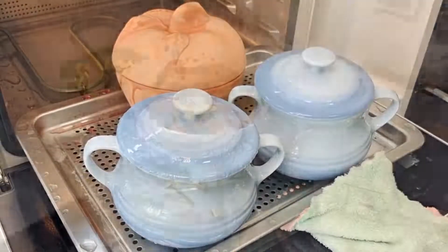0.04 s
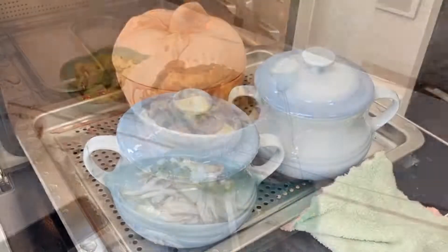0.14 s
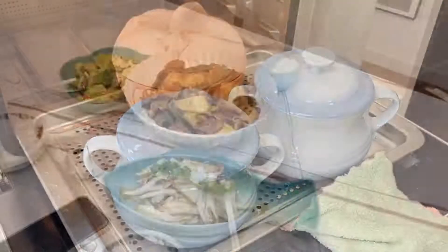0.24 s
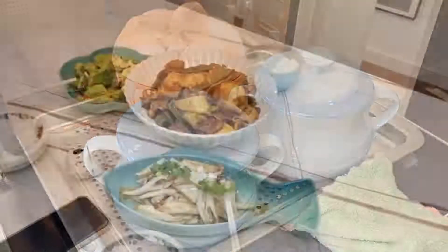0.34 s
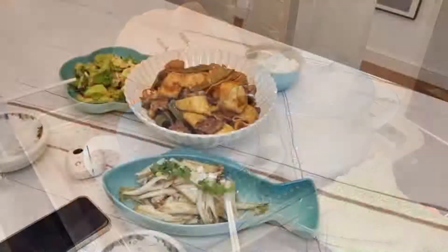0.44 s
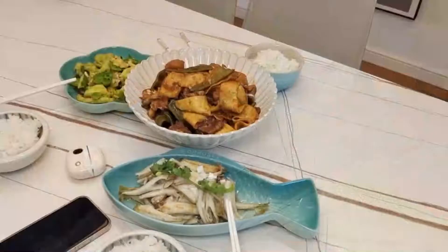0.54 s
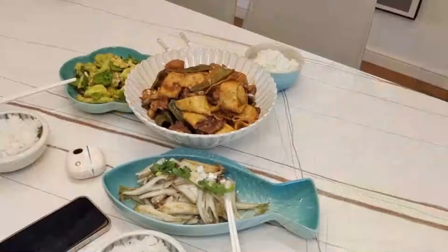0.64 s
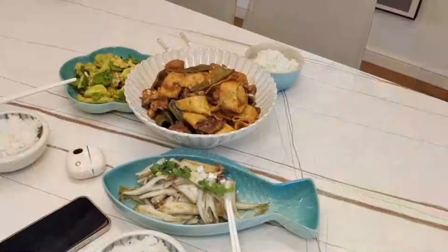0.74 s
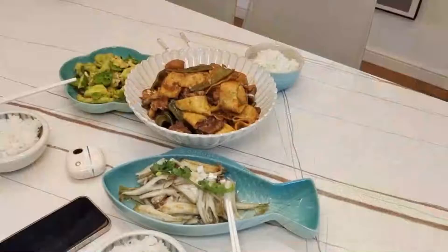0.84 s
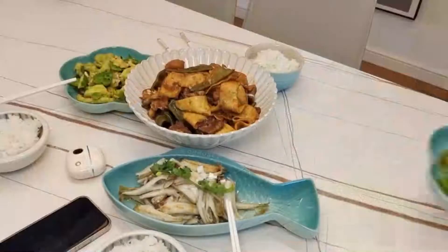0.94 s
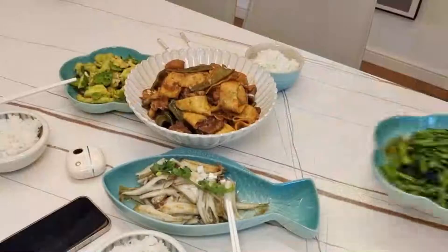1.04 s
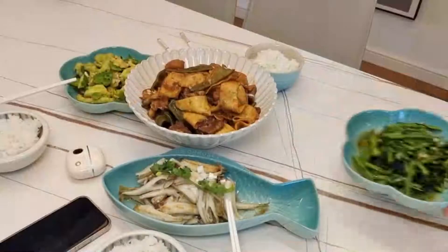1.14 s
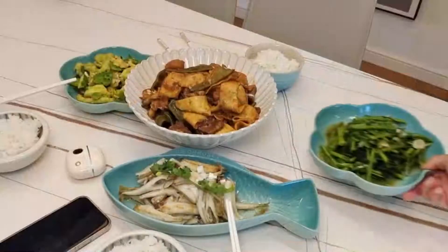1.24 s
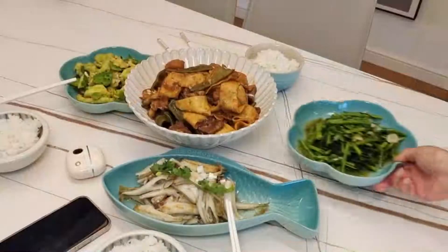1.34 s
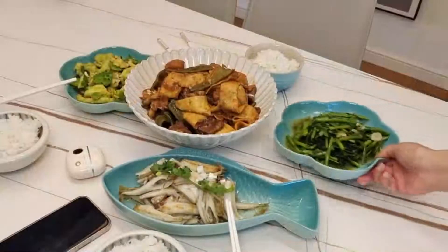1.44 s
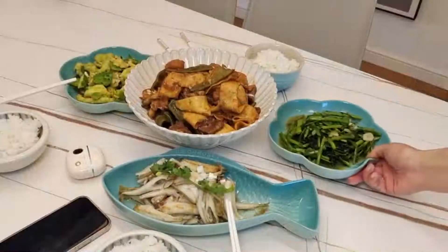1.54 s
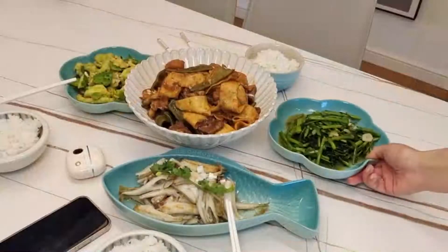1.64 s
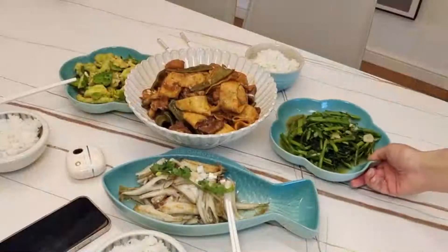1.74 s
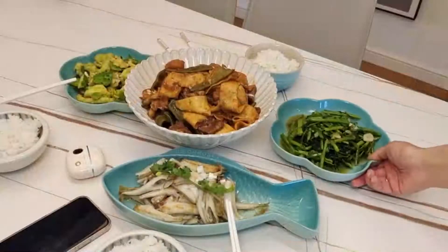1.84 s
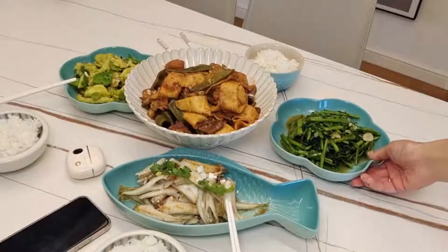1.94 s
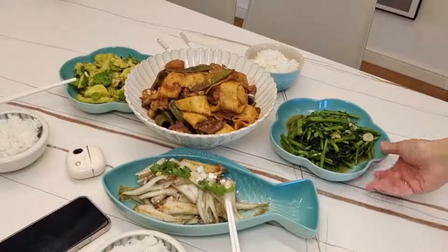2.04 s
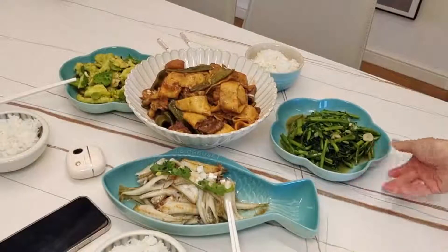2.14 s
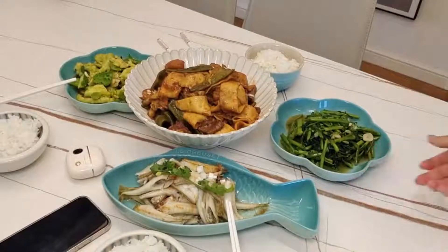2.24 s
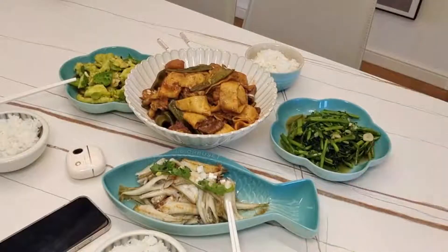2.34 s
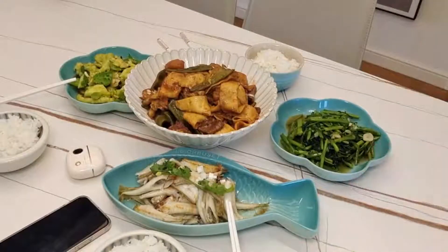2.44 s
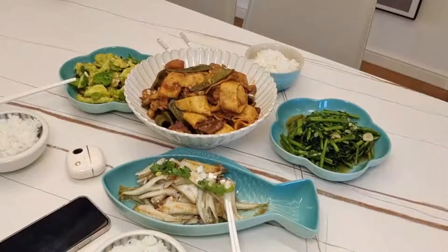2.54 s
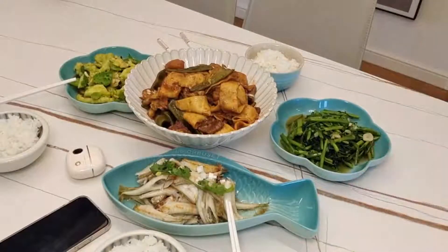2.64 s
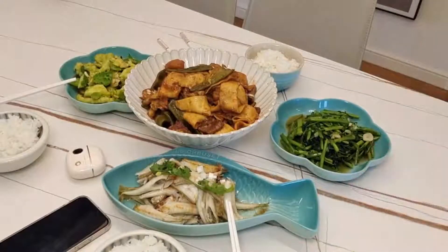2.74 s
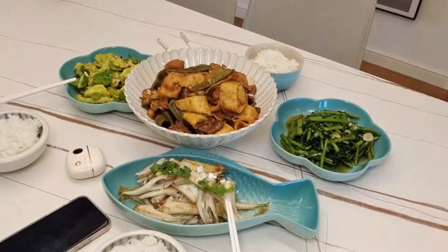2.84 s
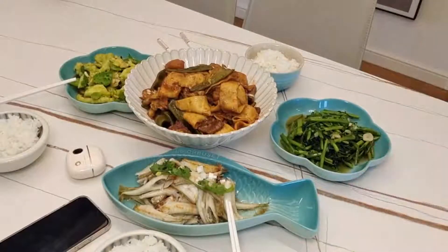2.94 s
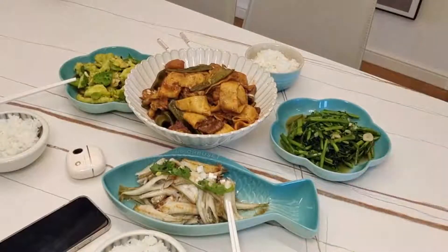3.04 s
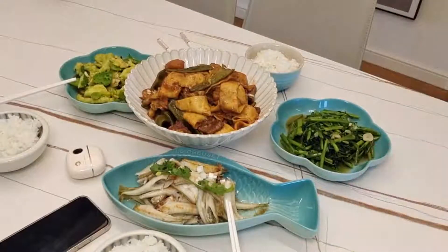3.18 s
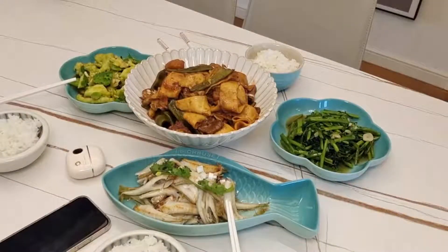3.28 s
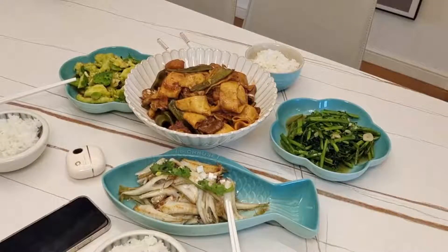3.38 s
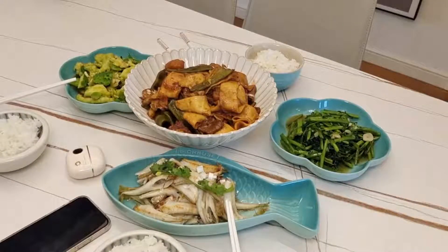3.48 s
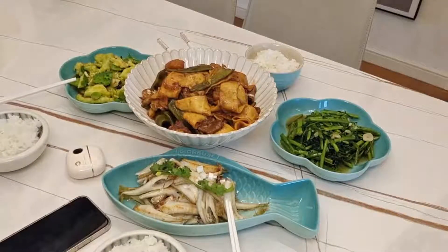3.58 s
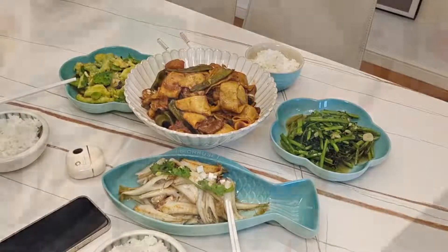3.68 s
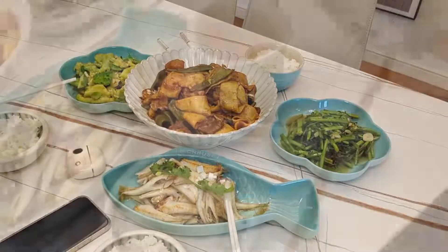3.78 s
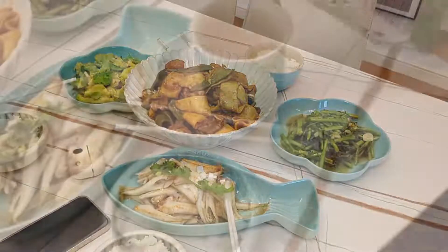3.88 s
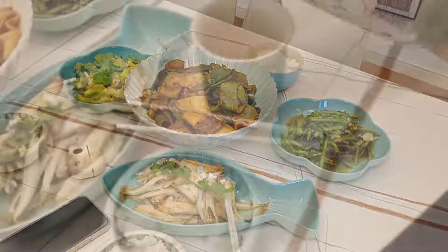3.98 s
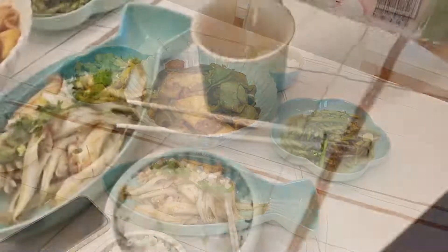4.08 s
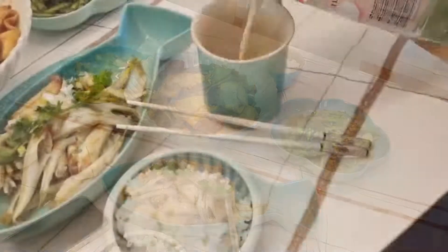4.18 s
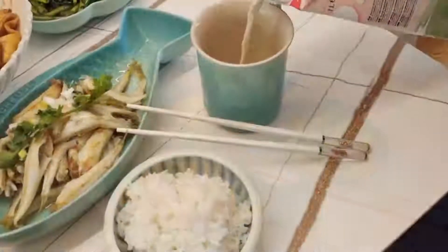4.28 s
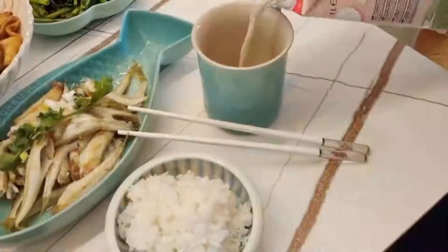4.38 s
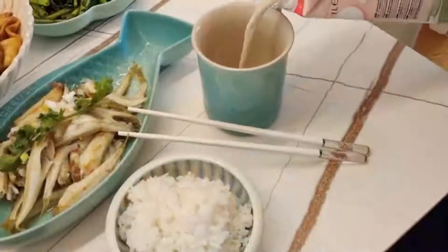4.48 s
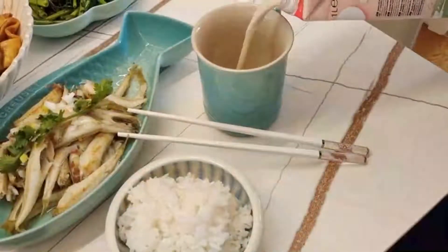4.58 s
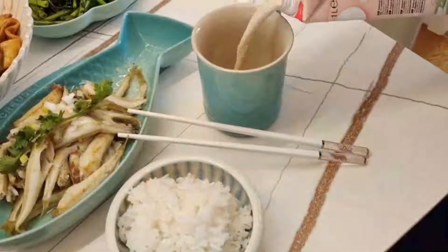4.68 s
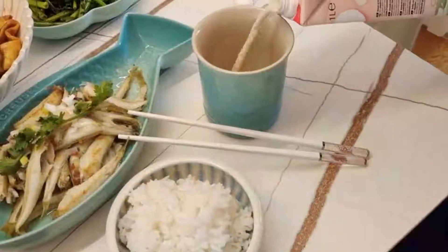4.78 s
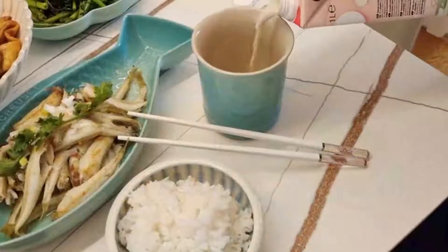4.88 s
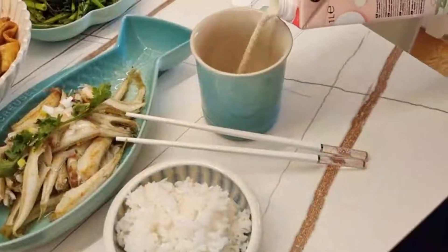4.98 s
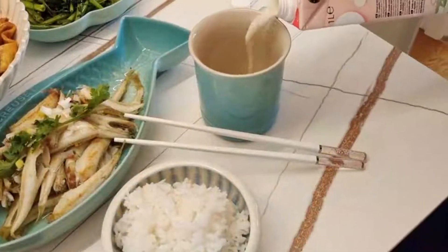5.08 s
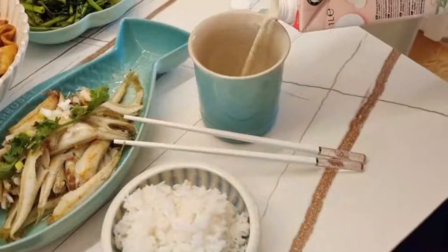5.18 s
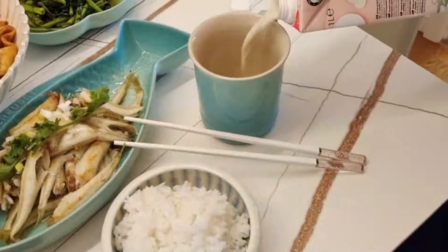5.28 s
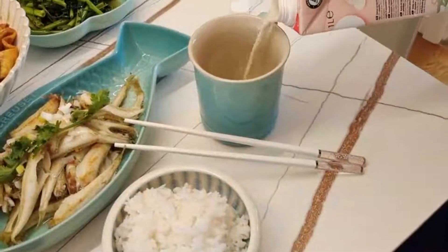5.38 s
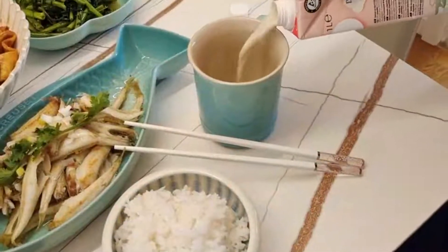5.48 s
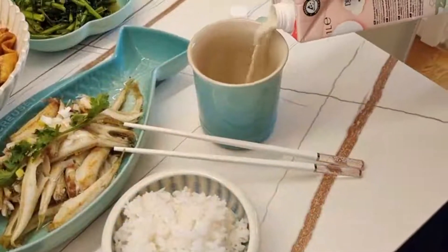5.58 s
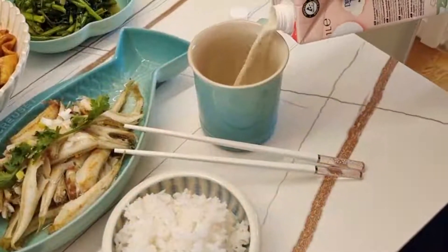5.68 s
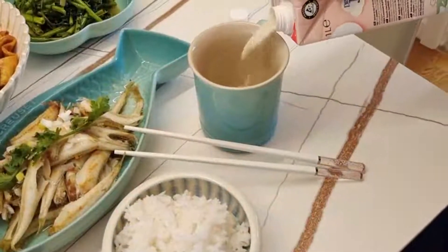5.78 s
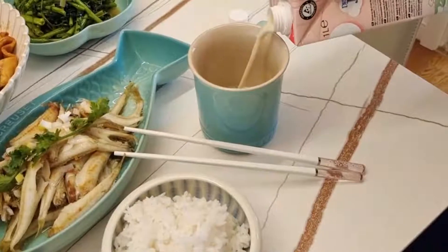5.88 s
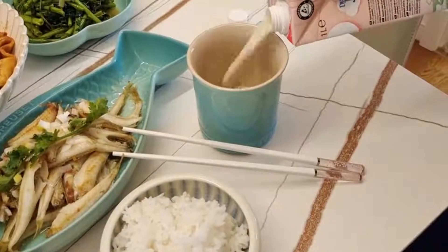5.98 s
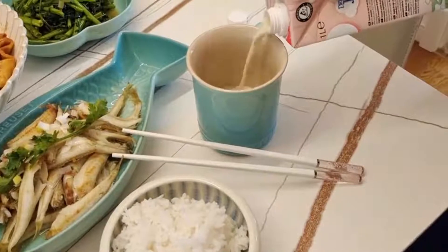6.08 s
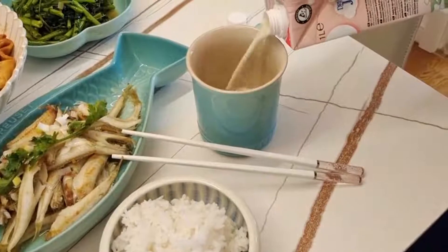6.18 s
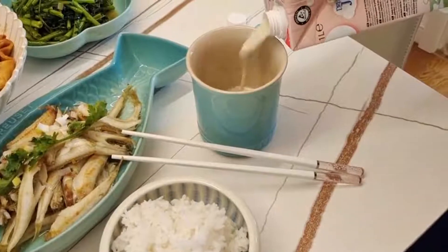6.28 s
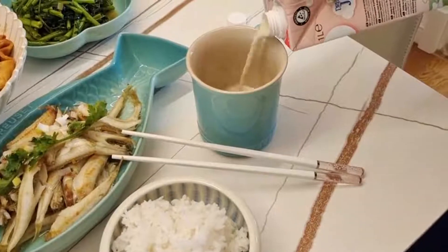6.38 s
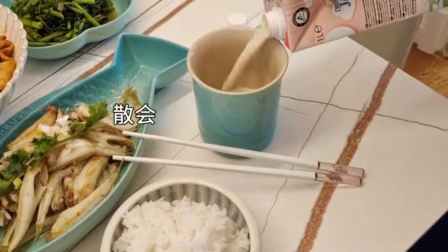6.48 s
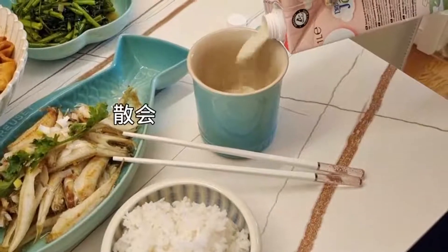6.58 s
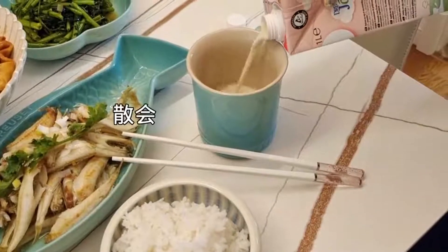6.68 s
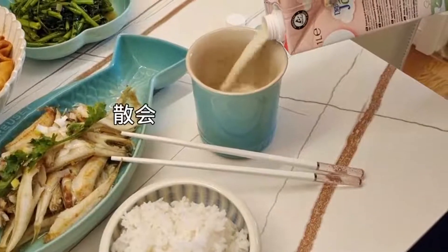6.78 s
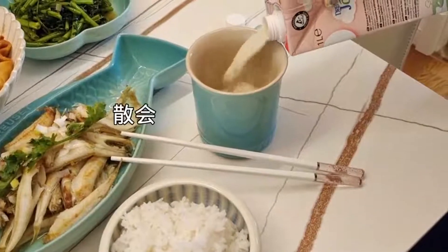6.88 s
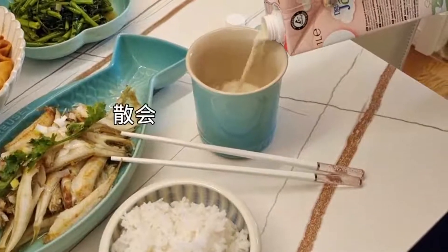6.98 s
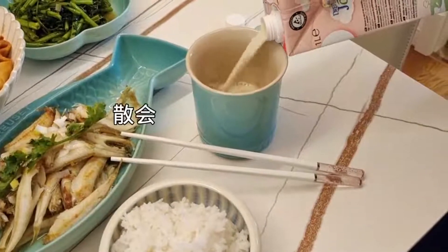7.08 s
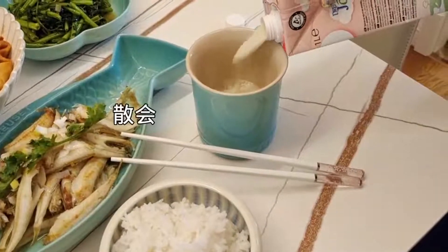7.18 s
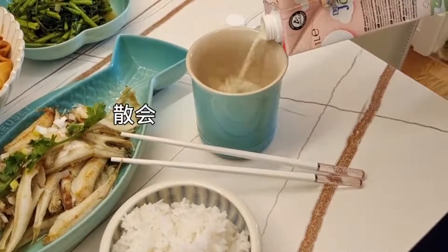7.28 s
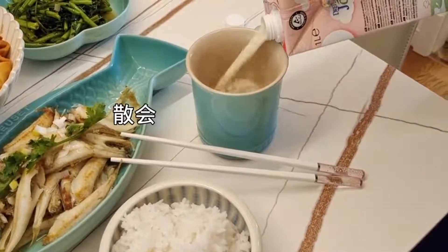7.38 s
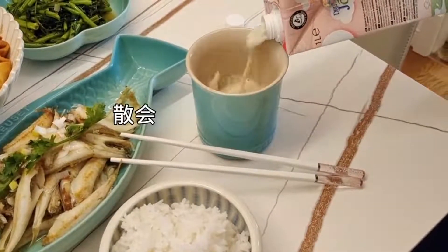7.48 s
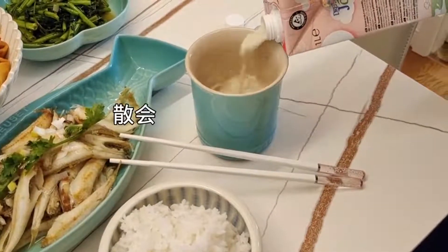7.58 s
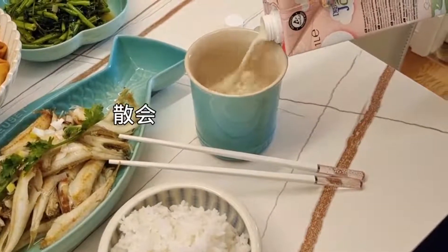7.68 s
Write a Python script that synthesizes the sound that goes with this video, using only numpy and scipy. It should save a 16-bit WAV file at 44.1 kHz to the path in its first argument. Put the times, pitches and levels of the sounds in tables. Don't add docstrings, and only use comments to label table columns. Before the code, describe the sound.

A cloth scuffs, a glazed dish knocks down sharply and rattles to rest; after near-silence, a drink pours in irregular blips and plops into a cup.

```python
import sys
import numpy as np
from scipy import signal
from scipy.io import wavfile
from scipy.ndimage import uniform_filter1d

SR = 44100
rng = np.random.default_rng(int(sys.argv[2]) if len(sys.argv) > 2 else 0)


def log_audio(samples):
    frames = np.atleast_2d(samples).T
    limited = np.clip(frames, -1, 1)
    pcm = np.round(limited * 32767).astype(np.int16)
    wavfile.write(sys.argv[1], SR, pcm)


def how_loud(loudness_db):
    steps = np.asarray(loudness_db, float) / 20
    return 10 ** steps


N = 340645

# t/s, first place level/dB, second place level/dB
PLACES = [
    (0, -60.5, -89),
    (3.487, -59.5, -79.5),
    (3.529, -57.5, -56.5),
    (4.1, -66.5, -55.5),
    (4.3, -66.5, -62),
    (4.9, -67.5, -61.5),
    (5.1, -81.5, -60.5),
    (7.8, -80.5, -57.5),
]
# f/Hz, likeness/0-1
BACKGROUND_LIKENESS = [(60, 0.86), (180, 0.81), (550, 0.19), (1650, 0.26), (4970, 0.23), (15000, 0.29)]
# f/Hz, level/dB
FIRST_TONE = [(25, -16), (65, -15), (102, -32.5), (195, -7.5), (330, -16), (516, -29), (800, -30),
              (1500, -42), (2150, -36.5), (4000, -50), (8000, -55.5), (16000, -52)]
SECOND_TONE = [(25, -16.5), (49, -2.5), (141, -20), (195, -4), (309, -14), (480, -25.5), (734, -22),
               (1300, -36), (2300, -37.5), (4000, -44), (8000, -49.5), (16000, -49)]
HUM_HZ, HUM_DB = 56.6, -60.5
WHINE_HZ, WHINE_DB = 5550, -93

# f/Hz, level/dB, time to fall 60 dB/s
LID_MODES = [(1933, 2, .26), (3545, 3, .26), (3690, -10, .2), (4640, -6, .3), (7270, -13, .2),
             (9150, -7, .25)]
LID_DB = -58

# t/s, peak level/dB, rise/s, time to fall 60 dB/s, hiss level/dB
SCUFFS = [
    (0.15, -57, 0.0074, 0.051, -10),
    (0.343, -59.5, 0.0019, 0.066, -30.5),
    (0.662, -38.5, 0.067, 0.13, -10.5),
    (3.509, -78, 0.0075, 0.54, 7),
    (3.54, -62, 0.02, 0.25, -21),
]
SCUFF_HZ = 2400

# t/s, blow level/dB, crunch time to fall 60 dB/s
KNOCKS = [(1.573, -27, 0.13), (1.578, -5.5, 0.072), (1.591, -13, 0.2), (1.597, -19, .05),
          (1.608, -21.5, 0.035), (1.614, -20, .05), (1.625, -24, 0.018), (1.644, -26, 0.27),
          (1.763, -28.5, 0.17), (1.778, -30.5, 0.042), (1.786, -21.5, 0.04), (1.795, -14, 0.03),
          (1.803, -13, 0.085), (1.812, -24.5, 0.035), (1.818, -31.5, 0.03), (1.827, -15, 0.036),
          (1.836, -23, 0.025), (1.843, -19, .04), (1.848, -22.5, 0.026), (1.858, -31.5, 0.035),
          (1.867, -41.5, 0.038), (1.876, -32.5, 0.038)]
# f/Hz, level/dB
HARD_COLOUR = [(35, -61.5), (103, -36.5), (346, -13), (1310, -2), (2000, 1.5), (5860, -22.5), (9570, -42),
               (15000, -51)]
DULL_COLOUR = [(50, -60.5), (448, -3.5), (607, -11.5), (749, -5.5), (1110, -5), (2250, -17), (8510, -62),
               (16000, -66.5)]
ROCKS_FROM_S = 1.77
LANDING_DULL, ROCKING_DULL = 0.18, 0.95
# f/Hz, level/dB, time to fall 60 dB/s
TABLE_MODES = [(135, -5, 0.25), (253, -21.5, 0.64), (360.4, -16.5, 0.21), (783, 1, 0.029), (820, 6, 0.011),
               (1252, -29.5, .6), (1505, -28, .6), (1060, 0, 0.013), (2535, -29, .25), (470, -42, .5),
               (1820, -27, 0.95), (2270, -30, 0.36)]
# f/Hz, level/dB, time to fall 60 dB/s
DISH_MODES = [(6200, -10, .1), (6100, -13, .09), (7300, -11.5, 0.12), (7750, -10.5, .15),
              (7970, -8.5, 0.07), (8800, -10, .14), (8900, -11, 0.11), (10500, -11.5, 0.11),
              (11000, -12, .12), (12300, -16, .1), (13230, -18.5, .08), (13860, -18.5, .1)]
DISH_DB = -45
# f/Hz, level/dB, time to fall 60 dB/s
TABLE_LONG_MODES = [(731, -35.5, 1.034), (578, -48, 1.4), (1000, -51, .8), (1960, -53.5, .9)]
TABLE_LONG_S = 1.828
# f/Hz, width/Hz, level/dB
SKID_BANDS = [(1300, 400, 0), (2900, 400, -9)]
SKID_END_S, SKID_DB, SKID_DB_PER_S = 1.577, -27, 1000

# t/s, peak level/dB, f/Hz
TICKS = [(3.541, -76, 2770), (3.556, -63, 2940), (3.576, -71, 2820), (3.602, -80.5, 2770),
         (3.624, -68, 2880), (3.735, -59.5, 3100), (3.733, -70, 1143), (3.749, -79, 1160),
         (4.183, -65.5, 7030), (4.313, -68.5, 2200), (4.319, -77.5, 2670), (4.699, -78, 2672),
         (4.754, -74, 2750)]
TICK_CYCLES = 9.8
# t/s, peak level/dB, f/Hz
SNAPS = [(3.621, -52, 5270), (3.735, -49, 4280), (3.735, -44, 5750), (3.747, -48, 5970), (4.904, -62, 5250),
         (4.916, -55, 5870), (4.929, -55, 6100), (5.367, -74, 9000), (5.541, -65, 12000),
         (6.409, -68, 2970), (6.563, -55, 2780), (6.738, -48, 1400), (6.788, -51, 1310),
         (6.889, -41.5, 1430), (7.107, -70, 1770), (7.229, -64, 2550), (7.315, -72, 2950),
         (7.632, -44, 2230), (7.678, -48, 2950)]
SNAP_CYCLES = 3.16
# t/s, peak level/dB, f/Hz
POPS = [(4.756, -59, 5180), (4.841, -53, 5170), (5.058, -58, 5570), (5.066, -58, 5400),
        (4.927, -53.5, 5820), (5.202, -52, 4160), (6.033, -55, 4620), (6.254, -52, 3950),
        (6.235, -51, 3590), (6.537, -53, 3780), (6.686, -50, 3900), (6.844, -47, 3600), (6.88, -46, 3390),
        (6.925, -51, 3900), (7, -51, 7680), (7.143, -49, 3450), (7.47, -52, 4940), (7.577, -54, 3630),
        (7.714, -52, 3620), (5.379, -42.5, 5520), (5.587, -45, 3450), (5.597, -43.5, 4710),
        (5.598, -40, 3870), (5.794, -48.5, 4230), (5.799, -43, 3440), (5.878, -37.5, 4580),
        (6.143, -38.5, 7960), (6.21, -47, 3360), (6.369, -47, 3360), (7.316, -42, 5800), (7.632, -41, 3840)]
POP_MS, POP_GLIDE = 2.33, 1.01
# t/s, peak level/dB, first f/Hz, last f/Hz, length/ms
GULPS = [(4.854, -58.5, 1150, 1220, 5.8), (4.969, -58, 1670, 2006, 10.5), (5.049, -60.5, 1856, 2090, 12.4),
         (5.066, -68, 2050, 2200, 6.9), (4.868, -70.5, 1390, 2000, 11), (5.06, -72.5, 2700, 2830, 7.5),
         (5.283, -42.5, 890, 1492, 13.7), (5.607, -56.5, 436, 433, 9.9), (5.94, -49.5, 586, 600, 14),
         (6.242, -64, 875, 880, 13), (6.407, -55.5, 420, 490, 23), (6.43, -53.5, 720, 844, 4.1),
         (6.549, -59.5, 780, 815, 8.3), (6.6, -66, 860, 990, 17), (6.765, -49.5, 241, 228, 23),
         (6.9, -56.5, 245, 221, 32), (7.5, -49.5, 232, 220, 21), (7.64, -50, 232, 225, 22),
         (7.17, -61, 402, 320, 15), (7.535, -48, 600, 563, 11), (6.615, -60, 320, 285, 13),
         (6.795, -51, 1060, 1124, 13), (6.9, -39.5, 1250, 1390, 5.9), (6.995, -54.5, 925, 990, 3.6),
         (7.108, -59, 1010, 1120, 6.9), (7.162, -59.5, 1342, 1244, 26), (7.192, -55.5, 690, 845, 12),
         (7.312, -53, 966, 1134, 6.5), (7.318, -51, 490, 415, 11.3), (7.36, -69, 920, 1095, 22),
         (7.559, -51, 1140, 1955, 18), (6.752, -43, 576, 426, 8.8), (6.762, -51, 560, 783, 16.6),
         (6.887, -38, 940, 890, 4.5), (6.897, -39, 1010, 812, 7.9), (6.909, -44, 366, 450, 19),
         (6.959, -52.5, 678, 864, 12.6), (7.014, -49, 304, 430, 14.3), (7.491, -37.5, 754, 734, 13),
         (7.495, -43.5, 1250, 1336, 7), (7.52, -42, 660, 714, 5.7), (7.632, -37.5, 760, 784, 2.8),
         (7.633, -47, 387, 343, 19), (7.707, -49, 668, 870, 7.7)]
# t/s, peak level/dB, f/Hz, length/ms
BLIPS = [(5.201, -51, 1873, 5.1), (5.282, -41.5, 1885, 4.9), (5.305, -37, 1940, 2.7),
         (5.514, -58, 2120, 5.6), (5.523, -53, 1970, 5.1), (5.555, -46.5, 1455, 4.3),
         (5.559, -47.5, 1520, 7), (5.567, -48, 1513, 3.5), (5.577, -46, 1830, 3.3), (5.606, -57, 2500, 3.4),
         (5.613, -60, 2790, 2.5), (5.62, -55, 2460, 3.2), (5.701, -50.5, 2660, 1.7), (5.797, -47, 1897, 8),
         (5.89, -41.5, 2370, 2.5), (5.901, -43.5, 1856, 4.5), (6.067, -39.5, 1810, 1.5),
         (6.148, -40.5, 1845, 4.8), (6.23, -53.5, 2483, 5.6), (6.738, -42, 1885, 4.2),
         (6.889, -45.5, 1890, 8.6), (6.9, -41, 2014, 6.5), (6.998, -41, 2070, 4.3), (7.013, -48, 2710, 1.8),
         (5.358, -69, 2060, 3.5), (5.385, -60.5, 2210, 10), (5.64, -63, 2800, 3.4), (5.665, -59, 2860, 2.9),
         (5.771, -54, 1460, 6.1), (6.209, -56, 2415, 7.9), (6.242, -47.5, 1520, 2.4),
         (6.265, -55, 2750, 3.4), (6.277, -55, 1790, 4.8), (6.544, -54, 1450, 4.1), (6.566, -66, 2840, 5.7),
         (6.698, -52, 2470, 2.7), (6.767, -50, 1620, 7.2), (6.969, -56, 2500, 11),
         (7.035, -57.5, 2790, 10.4), (7.108, -53, 1360, 4.1), (7.159, -64, 2680, 4.9),
         (7.209, -53, 1810, 7.2), (7.229, -47.5, 2220, 2.6), (7.267, -71, 2580, 26),
         (7.278, -60, 1420, 5.5), (7.376, -57, 1880, 4.6), (7.408, -64, 1510, 7), (7.571, -51, 1710, 5.8),
         (7.679, -44.5, 1886, 3.2), (7.32, -40, 1560, 3), (7.486, -36.5, 1990, 2.8),
         (7.503, -33.5, 2050, 3.8), (7.631, -35.5, 1460, 1.7)]
BLIP_GLIDE = 1.03
# t/s, peak level/dB, length/ms
PLOPS = [(5.285, -50.5, 10.4), (5.385, -59.5, 10), (5.434, -46, 12.7), (5.74, -56.5, 5.4),
         (5.766, -56.5, 10), (5.908, -49, 3.5), (5.916, -45, 10.5), (6.076, -45.5, 5.7), (6.448, -52, 3.1),
         (6.739, -42.5, 1.8), (6.788, -43.5, 2.1)]
PLOP_HZ, PLOP_HZ_PER_S = 811, 31
SCATTER_DB, SCATTER_S = -4, .03

# t/s, length/ms, force level/dB, lean to large bubbles/dB
PLUNGES = [(4.839, 29, -62.5, 5), (5.199, 4.2, -43.5, -19), (5.284, 49, -54, -22), (5.374, 5.5, -45.5, -7),
           (5.43, 5.5, -62, 0), (5.518, 89, -53, -25), (5.578, 15, -56, -10), (5.716, 68, -50.5, -28),
           (5.793, 1, -48, -22), (5.891, 66, -54, 9.5), (5.939, 230, -59, 7), (6.09, 2.3, -40, 6.5),
           (6.143, 2.3, -48, -11), (6.208, 42, -46, -31), (6.251, 11, -59.5, 13), (6.409, 37, -47.5, 12),
           (6.561, 5.4, -43, 12.5), (6.689, 8.3, -67.5, 13), (6.735, 14, -43.5, 15), (6.838, 48, -51, -12),
           (6.895, 103, -50.5, 16.5), (7.013, 11.4, -39.5, 9), (7.104, 4.8, -48.5, 13),
           (7.16, 7.4, -38.5, 8.5), (7.265, 4.8, -49, -22), (7.313, 3.4, -48.5, 21.5),
           (7.485, 3.7, -35.5, 16.5), (7.564, 12, -49, -16), (7.631, 1.9, -41, 19), (7.675, 5.9, -43, 16)]
# t/s, length/ms, froth level/dB, lean to spray/dB
SPLASHES = [(4.75, 6.2, -85, -21), (4.83, 20, -86, 14.5), (4.915, 6.7, -81, 19.5), (5.051, 4.5, -65, -1),
            (5.199, 2, -70, 2), (5.374, 3.1, -59.5, -23), (5.36, 3.5, -56.5, -15), (5.535, 14, -71, -14),
            (5.59, 17, -62.5, -33), (5.625, 11, -72, -40), (5.645, 3.8, -60.5, -41), (5.69, 7.5, -56, -29),
            (5.716, 36, -63.5, -10), (5.793, 1.7, -68.5, 5), (5.891, 21, -56, -36), (5.939, 32, -75.5, 11),
            (6.09, 3.5, -59, 5), (6.143, 3.2, -58.5, 11.5), (6.208, 24, -62, -32), (6.27, 30, -73, 17),
            (6.364, 17, -62, -37), (6.409, 11.6, -73, 20), (6.535, 3.7, -84, -24), (6.689, 15.4, -51, -21),
            (6.975, 17, -61, -22), (7.276, 12, -57, -23), (6.735, 43, -69.5, 14), (6.838, 11.5, -62.5, -40),
            (6.895, 24, -60, -5), (7.013, 46, -55.5, 0), (7.16, 11, -56.5, 7.5), (7.199, 3.9, -61.5, 10),
            (7.313, 10.3, -46, -2), (7.42, 5.5, -55.5, -15), (7.485, 8.2, -61, 2), (7.564, 104, -66, -1),
            (7.631, 3.6, -47, -11), (7.678, 6.3, -58, -2)]
# t/s, f/Hz
AIR_COLUMN = [
    (4.7, 705),
    (5.8, 772),
    (6.3, 945),
    (6.998, 977),
    (7.72, 1020),
]
# f/Hz, width/Hz, level/dB
CUP_WALL = [(2210, 5.5, -4), (2684, 74, 3)]
# f/Hz, level/dB
SPRAY_COLOUR = [(2940, -20.5), (5000, -1), (6930, -4.5), (8580, 1), (11400, -10), (14900, -2)]
LEAD_S = 14e-6
UNSHARED = .6

# f/Hz, time to fall 60 dB/s
ROOM = [(100, 0.94), (400, 0.35), (1000, 0.5), (2500, 0.55), (5000, 0.43), (12000, 0.24)]
# f/Hz, likeness/0-1
ECHO_LIKENESS = [(60, 0.95), (240, 0.5), (950, 0.3), (3770, 0.1), (15000, 0.2)]
FLUTTER_HZ, FLUTTER_SHARE = 252, .22


def evened(x):
    return x / np.sqrt(np.mean(x ** 2) + 1e-20)


def read(points, hz):
    f, value = np.transpose(points)
    return np.interp(np.log(hz + 1), np.log(f + 1), value)


def add(mix, s, sound):
    part = mix[round(s * SR):][:len(sound)]
    part += sound[:len(part)]


def resonate(x, hz, width):
    turn = np.exp(2j * np.pi * np.cumsum(hz * np.ones(len(x))) / SR)
    r = np.exp(-np.pi * width / SR)
    smooth = signal.lfilter([1 - r], [1, -r], x / turn + 1e-18)
    return 2 * (turn * smooth).real


def ring(modes, seconds):
    t = np.arange(round(seconds * SR)) / SR
    return sum(how_loud(db - 60 * t / t60) * np.sin(2 * np.pi * hz * t) for hz, db, t60 in modes)


def causal(x, points):
    gain = np.log(how_loud(read(points, abs(np.fft.fftfreq(8192, 1 / SR)))))
    response = np.fft.ifft(np.exp(np.conj(signal.hilbert(gain)))).real[:4096]
    return signal.oaconvolve(x, response)[:N]


def partly_alike(left, other, likeness, hz):
    same = np.clip(read(likeness, hz), -1, 1)[:, None]
    return np.array([left, same * left + np.sqrt(1 - same ** 2) * other])


def patchy(noise, bins, frames):
    return evened(uniform_filter1d(uniform_filter1d(noise, bins, 0), frames, 1))


def room_tone():
    frames, hz = N // 512 + 5, np.fft.rfftfreq(2048, 1 / SR)
    s, first_db, second_db = np.transpose(PLACES)
    t, out = np.arange(N) / SR, 0
    for tone, level_db in ((FIRST_TONE, first_db), (SECOND_TONE, second_db)):
        a, b, c, d, uneven = rng.standard_normal((frames, 1025, 5)).T
        z = partly_alike(a + 1j * b, c + 1j * d, BACKGROUND_LIKENESS, hz)
        z *= how_loud(read(tone, hz)[:, None] + 3.0 * patchy(uneven, 8, 5))
        bed = signal.istft(z, nperseg=2048, noverlap=1536)[1][:, :N]
        out = out + how_loud(np.interp(t, s, level_db)) * evened(bed)
    hum_db = HUM_DB + 3 + np.interp(t, s, first_db) - first_db[0]
    hum = how_loud(hum_db) * np.sin(2 * np.pi * HUM_HZ * t)
    whine = how_loud(WHINE_DB) * evened(resonate(rng.standard_normal(N), WHINE_HZ, 36))
    return out + hum + whine


def lid():
    out = np.zeros(N)
    add(out, 0, how_loud(LID_DB) * ring(LID_MODES, 0.25))
    return out * (1 + 0.62 * np.cos(2 * np.pi * 27 * np.arange(N) / SR))


def scuffs():
    out, t = np.zeros(N), np.arange(SR // 2) / SR
    for s, db, rise, t60, hiss_db in SCUFFS:
        noise = rng.standard_normal(len(t))
        hump = evened(resonate(resonate(noise, SCUFF_HZ, 710), SCUFF_HZ, 710))
        upper = 1.8 * resonate(noise, 4830, 400) + resonate(noise, 6850, 630)
        upper = evened(upper + 0.48 * resonate(noise, 10700, 900))
        swell = how_loud(db - 60 * t / t60) * np.minimum(t / rise, 1)
        add(out, s, swell * (hump + how_loud(hiss_db) * upper))
    return out


def dish():
    hard, dull, long_rings = np.zeros((3, N))
    t = np.arange(SR // 5) / SR
    grit = rng.standard_normal(N)
    for s, db, t60 in KNOCKS:
        grain = grit[round(7 * s * SR) % (N // 2):][:len(t)]
        crunch = .38 * grain * how_loud(-60 * t / t60) * np.minimum(t / 0.0038, 1)
        crunch[:24] += 2.4 * np.hanning(24)
        dull_share = LANDING_DULL if s < ROCKS_FROM_S else ROCKING_DULL
        add(hard, s, how_loud(db) * np.sqrt(1 - dull_share) * crunch)
        add(dull, s, how_loud(db) * np.sqrt(dull_share) * crunch)
    push = how_loud(12.5) * causal(hard, HARD_COLOUR) + how_loud(11.5) * causal(dull, DULL_COLOUR)
    scrape = grit[:len(t)]
    skid = sum(how_loud(db) * resonate(scrape, hz, width) for hz, width, db in SKID_BANDS) + .03 * scrape
    swell = how_loud(SKID_DB - SKID_DB_PER_S * t[::-1])
    add(push, SKID_END_S - len(t) / SR, swell * evened(skid))
    add(long_rings, TABLE_LONG_S, ring(TABLE_LONG_MODES, 1))
    table_ring = how_loud(-38.0) * signal.oaconvolve(push, ring(TABLE_MODES, 0.87))[:N]
    dish_ring = how_loud(DISH_DB) * signal.oaconvolve(hard, ring(DISH_MODES, .4))[:N]
    return long_rings + push + table_ring + dish_ring


def bubble(hz, end_hz, length):
    t = np.arange(round(3.3 * length * SR) + 20) / SR
    pitch = hz + (end_hz - hz) * np.minimum(t / length, 1.3)
    swell = np.sin(np.pi / 2 * np.minimum(t / (.0015 + 0.45 * length), 1)) ** 2
    return swell * how_loud(-7 * (t / length) ** 1.48) * np.sin(2 * np.pi * np.cumsum(pitch) / SR)


def singles():
    def fill_hz(s):
        return PLOP_HZ + PLOP_HZ_PER_S * (s - PLOPS[0][0])

    rows = [(s, db, hz, hz, 1000 * TICK_CYCLES / hz) for s, db, hz in TICKS]
    rows += GULPS
    rows += [(s, db, fill_hz(s), fill_hz(s), ms) for s, db, ms in PLOPS]
    rows += [(s, db, hz, BLIP_GLIDE * hz, ms) for s, db, hz, ms in BLIPS]
    rows += [(s - .001, db, hz, POP_GLIDE * hz, POP_MS) for s, db, hz in POPS]
    out = np.zeros(N)
    for s, db, hz, end_hz, ms in rows:
        add(out, s - .001, how_loud(db + 12.5) * bubble(hz, end_hz, max(ms, 2) / 1000))
    for s, db, hz in SNAPS:
        add(out, s, how_loud(db + 21.5) * bubble(hz, hz, SNAP_CYCLES / hz)[40:])
    t = np.arange(SR // 12) / SR
    facets = (rng.random(len(t)) < 900 / SR) * rng.standard_normal(len(t)) * how_loud(-60 * t / SCATTER_S)
    scatter = signal.oaconvolve(out, facets / np.linalg.norm(facets))[:N]
    return out + how_loud(SCATTER_DB) * scatter


def follow(rows, lean, t60):
    power, t = np.zeros(N), np.arange(-SR // 20, SR // 3) / SR
    for s, ms, db, lean_db in rows:
        swell_db = 2200 * np.maximum(-t, 0)
        fade_db = 60 * np.maximum(t - ms / 1000, 0) / t60
        add(power, s + t[0], how_loud(db + lean * lean_db - fade_db - swell_db) ** 2)
    return np.sqrt(power)


def churn(lo_hz, hi_hz, surge, per_s, cycles):
    out, power = 0, 0
    pitches, glides = np.geomspace(lo_hz, hi_hz, 12), rng.uniform(0.77, 1.25, 12)
    for hz, glide, life in zip(pitches, glides, rng.uniform(0.2, 1.643, 12)):
        loudness = how_loud(3.35 * np.minimum(rng.exponential(1, N), 4))
        size = loudness * (rng.random(N) < per_s / 12 / SR)
        shape = bubble(hz, glide * hz, life * cycles / hz)
        out = out + signal.oaconvolve(size * surge, shape)[:N]
        power = power + np.mean(size ** 2) * np.sum(shape ** 2)
    return out / np.sqrt(power)


def pour():
    large = how_loud(-17.0) * churn(332.5, 1280, follow(PLUNGES, 0.83, 0.16), 800, 5.9)
    middle = how_loud(-7.5) * churn(1216.0, 3217, follow(PLUNGES, 0, 0.15), 2000, 7.5)
    wet = singles() + large + middle
    froth_surge = follow(SPLASHES, 0, 0.022) + how_loud(-27.5) * follow(PLUNGES, 0, 0.12)
    wet = wet + how_loud(3.0) * churn(3230, 7970, froth_surge, 1100, 20.2)
    air = resonate(wet, np.interp(np.arange(N) / SR, *np.transpose(AIR_COLUMN)), 130)
    wall = sum(how_loud(db) * resonate(wet, hz, width) for hz, width, db in CUP_WALL)
    return wet + how_loud(4.0) * air + how_loud(8.5) * wall


def spray():
    crackle = how_loud(5.1 * rng.standard_normal(N // 60 + 1).repeat(60)[:N])
    hz, _, z = signal.stft(crackle * rng.standard_normal((3, N)), SR, nperseg=256)
    patches = patchy(rng.standard_normal(z.shape[1:]), 6, 5)
    z = np.array([z[0] * np.exp(2j * np.pi * hz[:, None] * LEAD_S), *z])
    z = z * how_loud(read(SPRAY_COLOUR, hz)[:, None] + 4.9 * patches)
    early, late, left, right = signal.istft(z, nperseg=256)[1][:, :N]
    hiss = evened(np.array([early, late]) + UNSHARED * np.array([left, right]))
    surge = follow(SPLASHES, 1.0, 0.055) + how_loud(-34.5) * follow(PLUNGES, 0, 0.32)
    return how_loud(5.0) * surge * hiss


def room(x):
    taps = np.zeros((2, SR))
    at = np.arange(100, SR - 20, 20) + rng.integers(0, 20, (2, (SR - 101) // 20))
    np.put_along_axis(taps, at, rng.choice([-1., 1.], at.shape), 1)
    hz, t, z = signal.stft(taps, SR, nperseg=256)
    z = partly_alike(z[0], z[1], ECHO_LIKENESS, hz) * how_loud(-60 * t / read(ROOM, hz)[:, None])
    tail = signal.istft(z, SR, nperseg=256)[1]
    loop = np.zeros(round(SR / FLUTTER_HZ) + 1)
    loop[0], loop[-1] = 1, -FLUTTER_SHARE
    tail = signal.lfilter([1], loop, tail)
    return signal.fftconvolve(x[None], tail / np.linalg.norm(tail[0]), axes=1)[:, :N]


def ports(x, count, pan_db):
    return np.array([np.roll(x, count) * how_loud(pan_db / 2), x * how_loud(-pan_db / 2)])


def scene():
    small, knock, drink, hiss = lid() + scuffs(), dish(), pour(), spray()
    treble = signal.butter(2, 4800, "high", fs=SR, output="sos")
    fine = signal.sosfiltfilt(treble, drink)
    near = ports(small, count=12, pan_db=11.5) + ports(knock, count=-11, pan_db=-1)
    near = near + ports(drink - fine, count=-3, pan_db=3.0) + ports(fine, count=-1, pan_db=-7.0)
    to_room = how_loud(-2) * small + how_loud(1.0) * knock + how_loud(-12.5) * (drink - 0.43 * fine + hiss[0])
    return near + hiss + room(to_room) + room_tone()


def band_limit(x):
    return signal.sosfilt(signal.butter(12, 15850, fs=SR, output="sos"), x)


def record(dry):
    power_db = 10 * np.log10(abs(uniform_filter1d((dry ** 2).mean(0), 400)) + 1e-12)
    fall = np.arange(N) * 6.2 / SR
    over_db = np.maximum(np.maximum.accumulate(power_db + fall) - fall + 22.0, 0)
    ducked = dry / how_loud(0.25 * uniform_filter1d(over_db, 200))
    low_pass = signal.cheby2(14, 60, 16000, fs=SR, output="sos")
    mix = signal.sosfilt(low_pass, np.tanh(ducked))
    return band_limit(mix)


dry = scene()
out = record(dry)
log_audio(out)
```